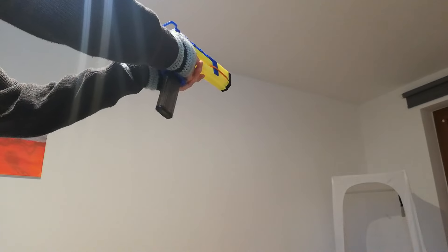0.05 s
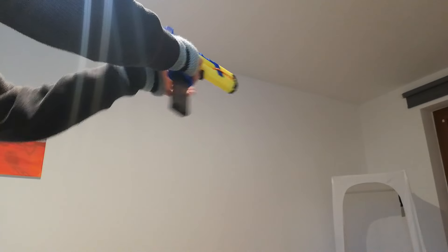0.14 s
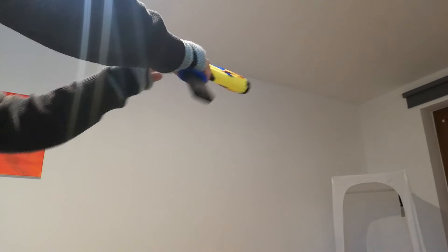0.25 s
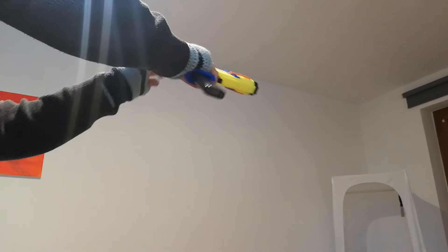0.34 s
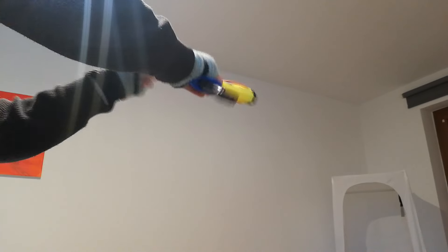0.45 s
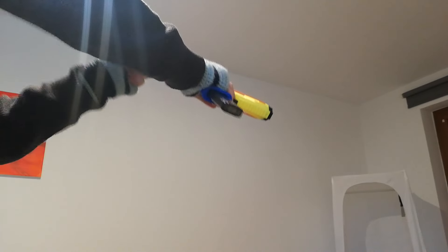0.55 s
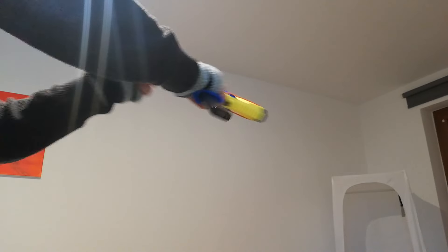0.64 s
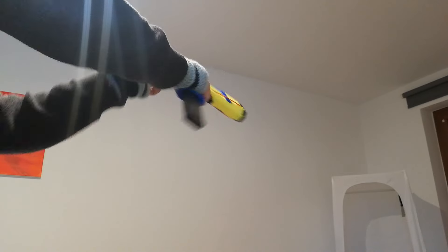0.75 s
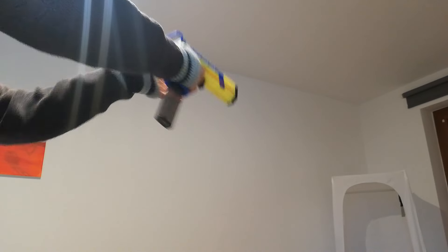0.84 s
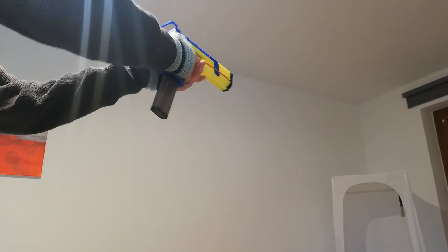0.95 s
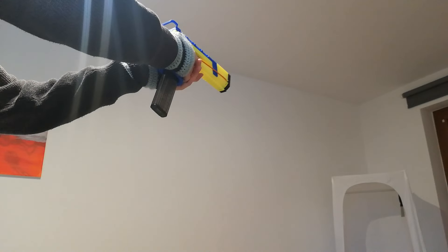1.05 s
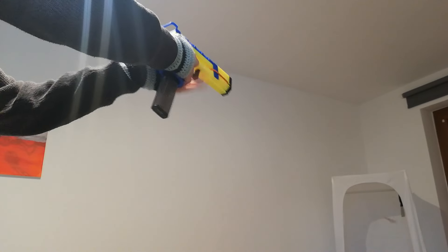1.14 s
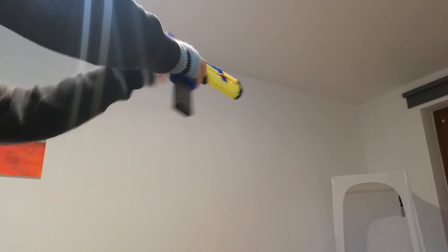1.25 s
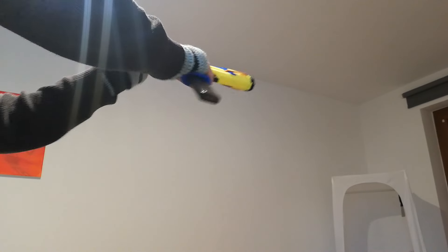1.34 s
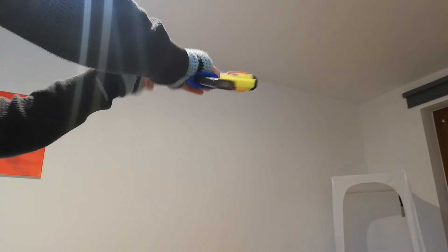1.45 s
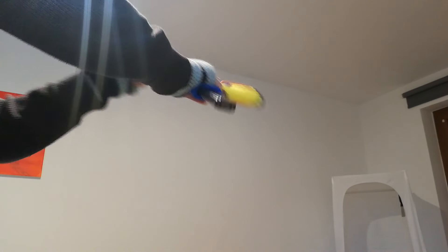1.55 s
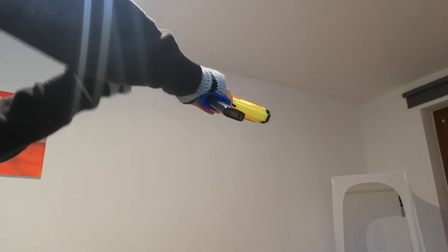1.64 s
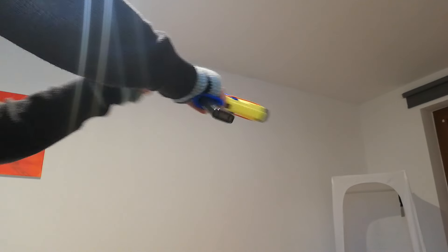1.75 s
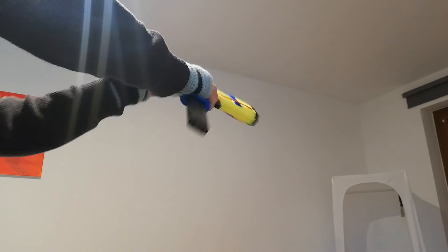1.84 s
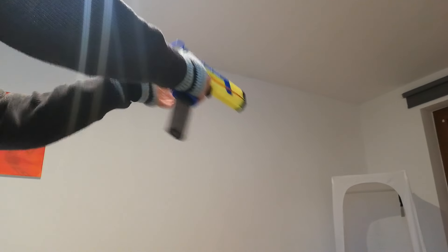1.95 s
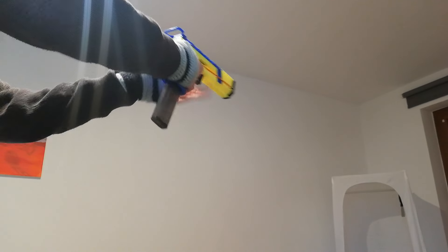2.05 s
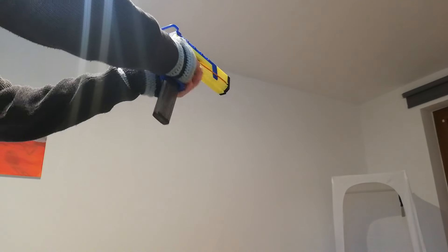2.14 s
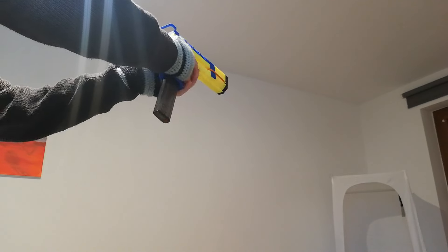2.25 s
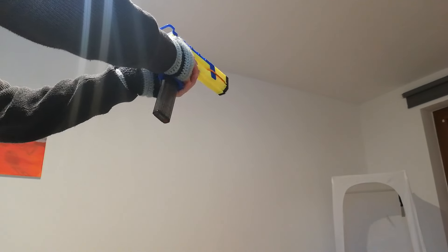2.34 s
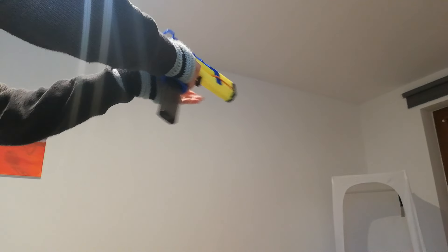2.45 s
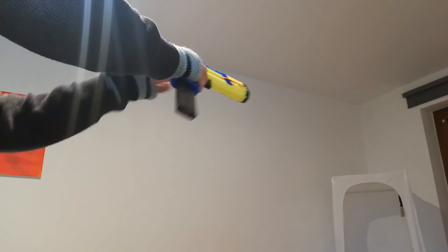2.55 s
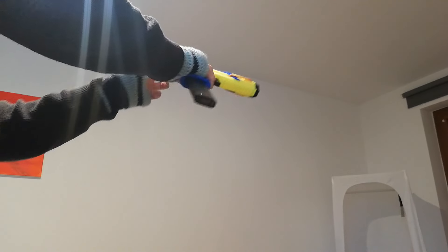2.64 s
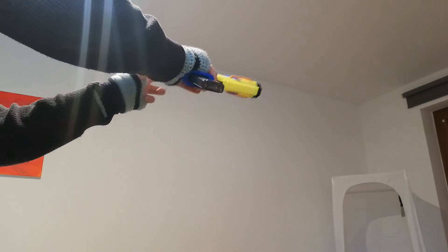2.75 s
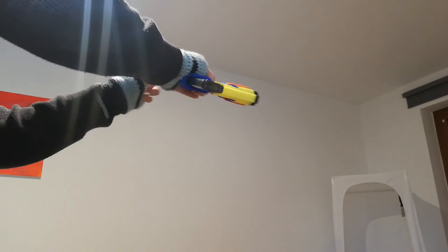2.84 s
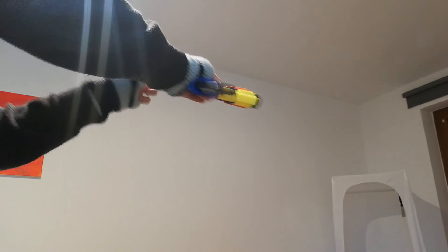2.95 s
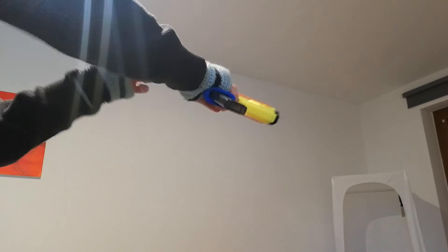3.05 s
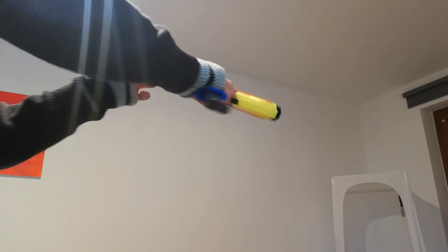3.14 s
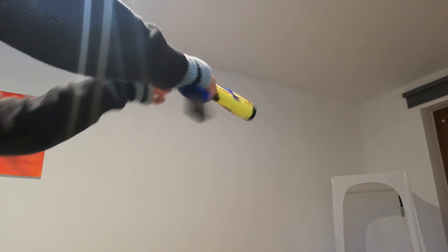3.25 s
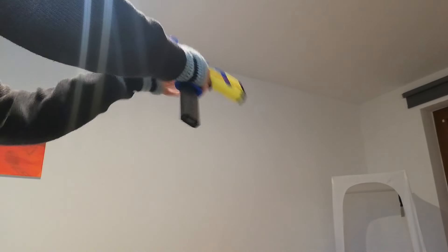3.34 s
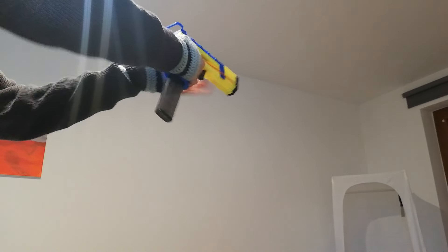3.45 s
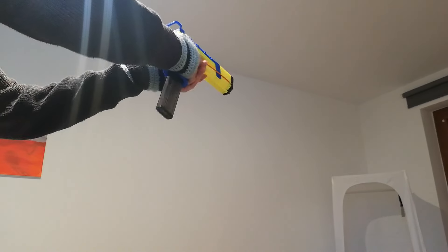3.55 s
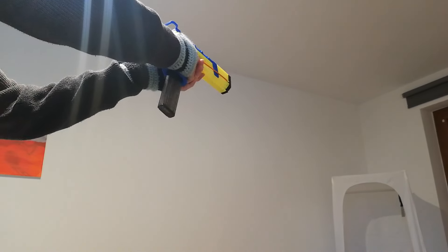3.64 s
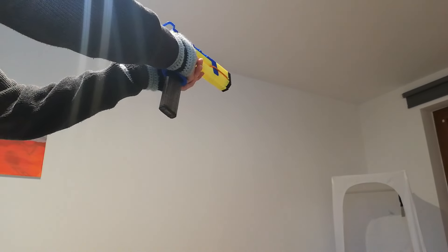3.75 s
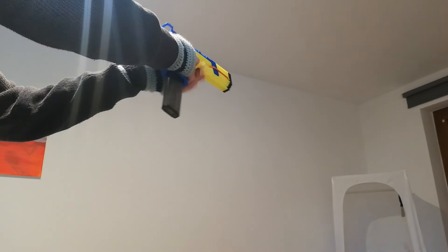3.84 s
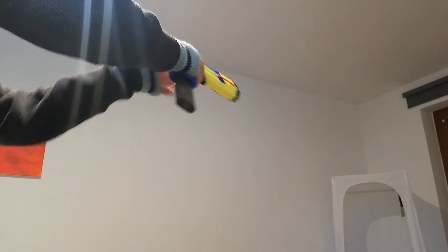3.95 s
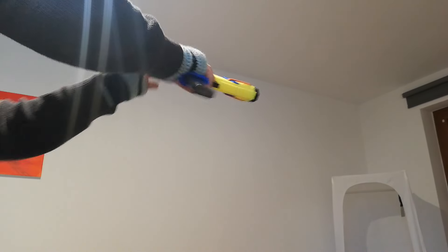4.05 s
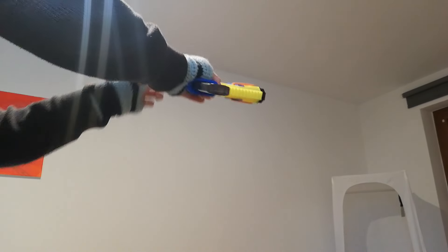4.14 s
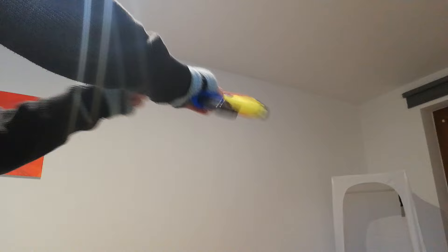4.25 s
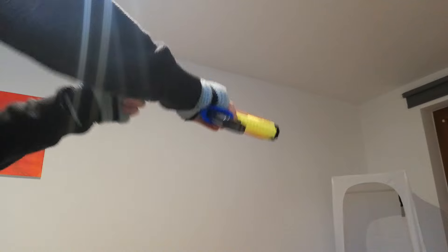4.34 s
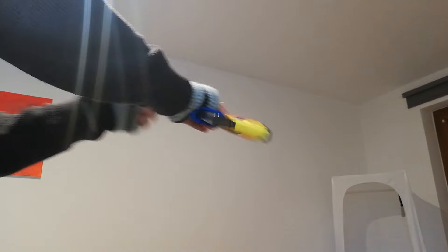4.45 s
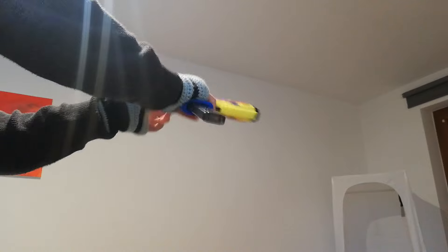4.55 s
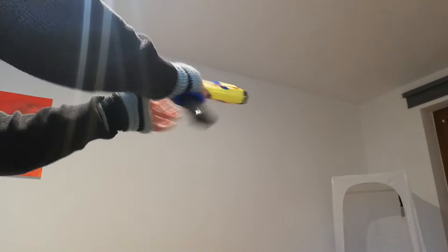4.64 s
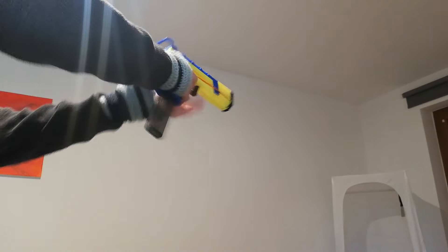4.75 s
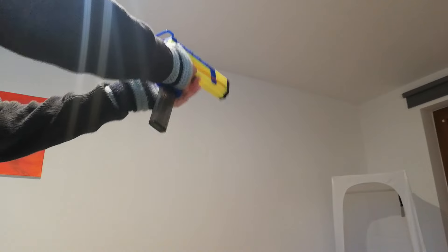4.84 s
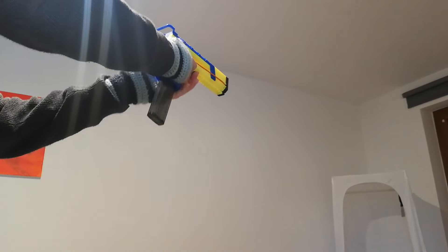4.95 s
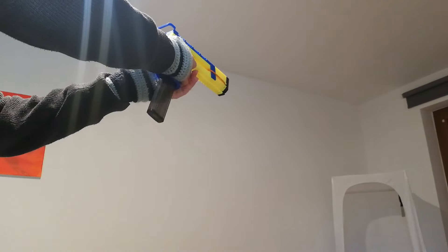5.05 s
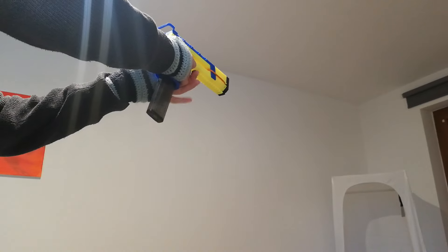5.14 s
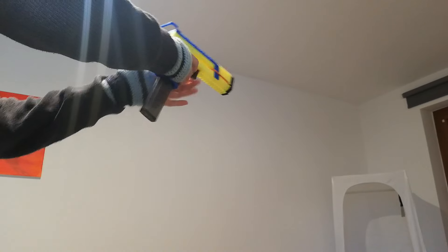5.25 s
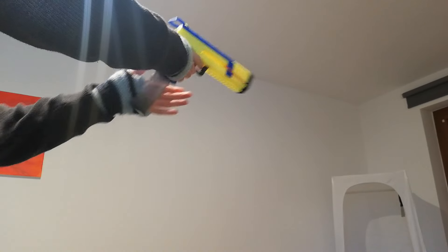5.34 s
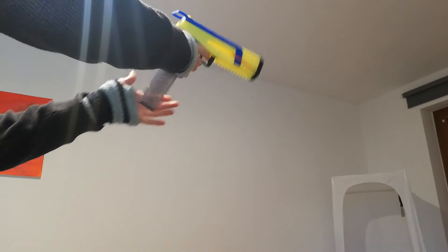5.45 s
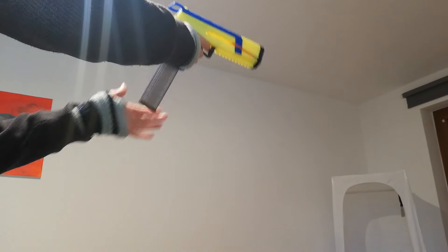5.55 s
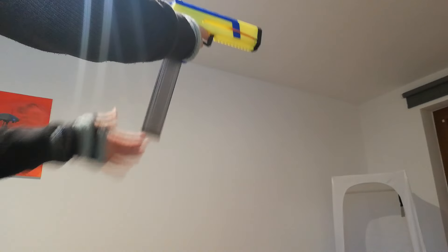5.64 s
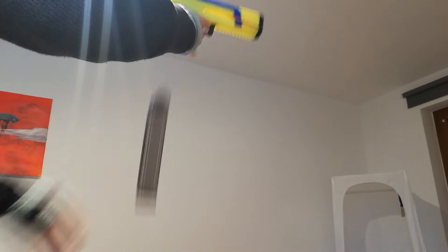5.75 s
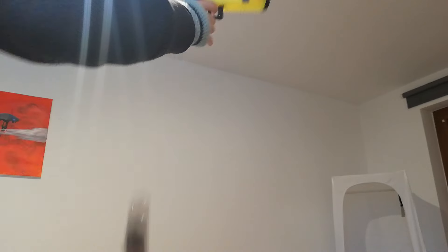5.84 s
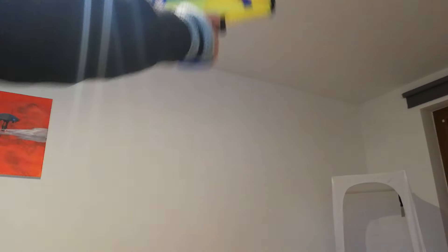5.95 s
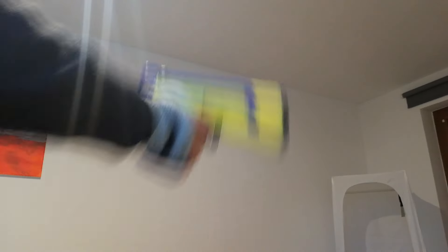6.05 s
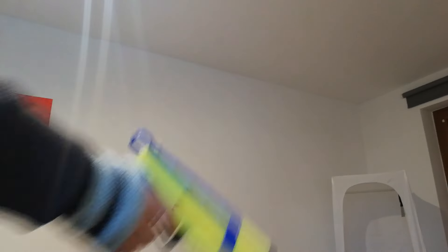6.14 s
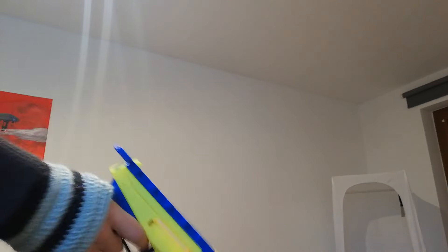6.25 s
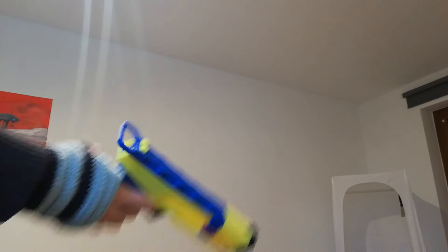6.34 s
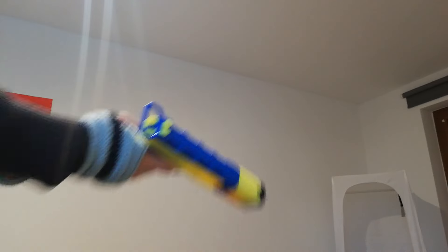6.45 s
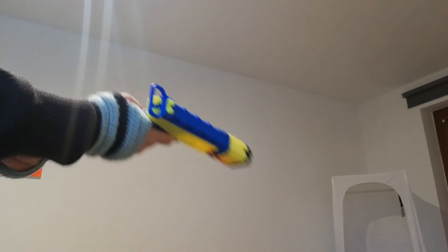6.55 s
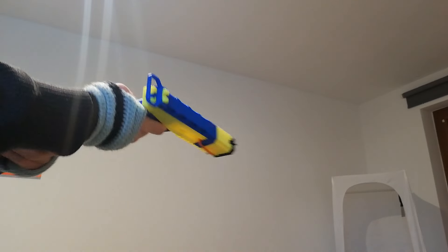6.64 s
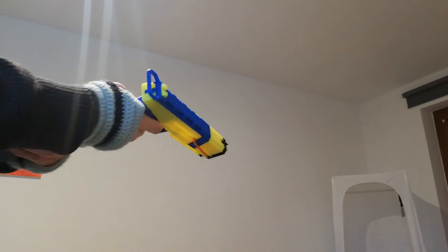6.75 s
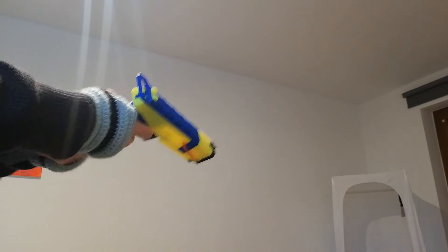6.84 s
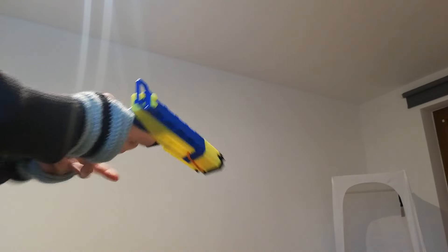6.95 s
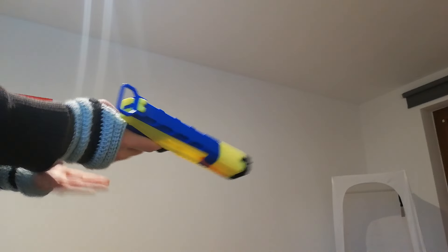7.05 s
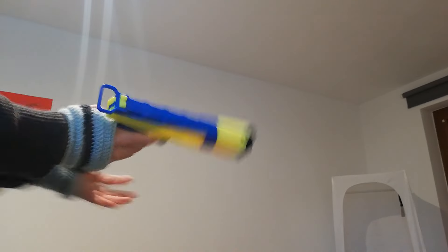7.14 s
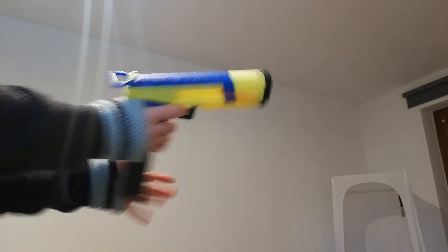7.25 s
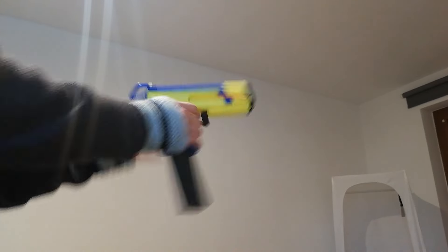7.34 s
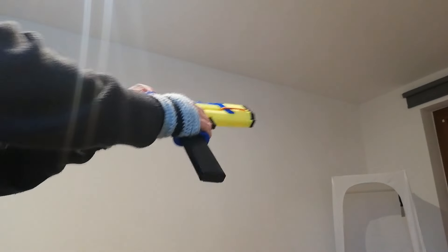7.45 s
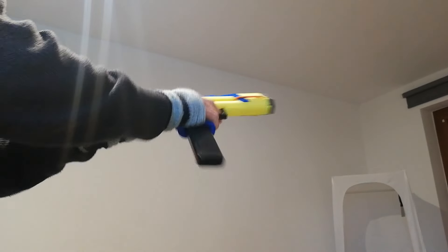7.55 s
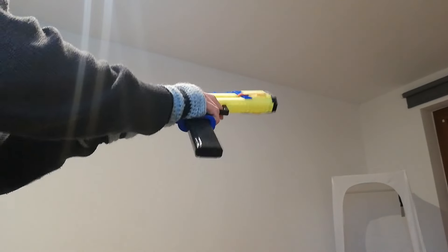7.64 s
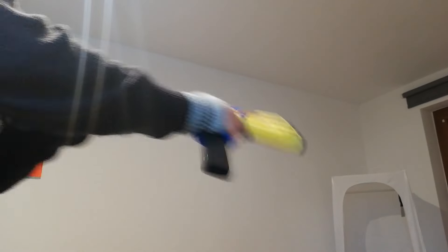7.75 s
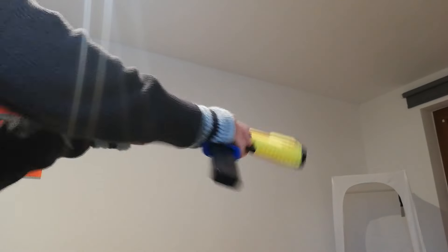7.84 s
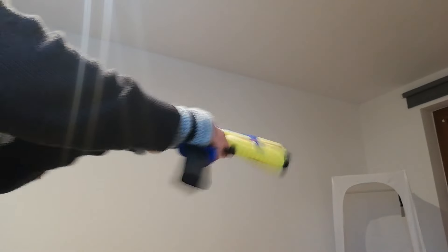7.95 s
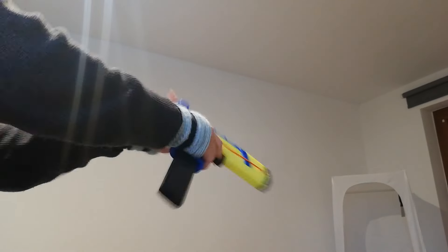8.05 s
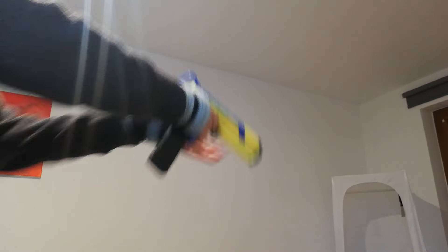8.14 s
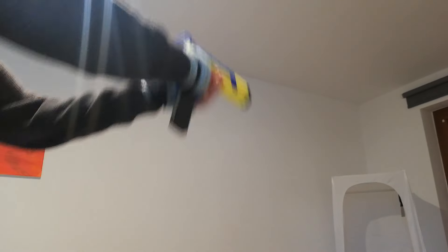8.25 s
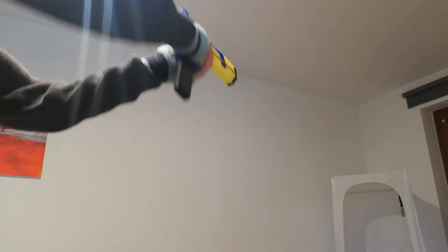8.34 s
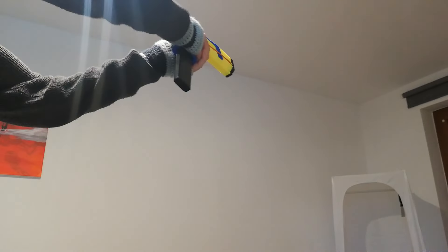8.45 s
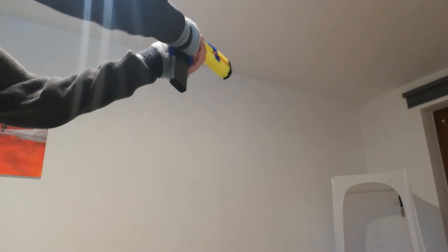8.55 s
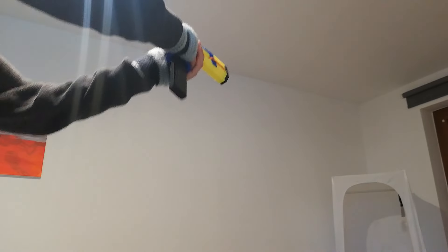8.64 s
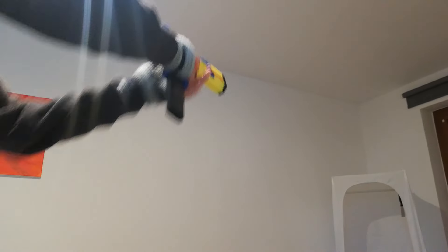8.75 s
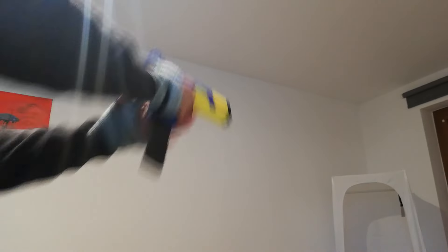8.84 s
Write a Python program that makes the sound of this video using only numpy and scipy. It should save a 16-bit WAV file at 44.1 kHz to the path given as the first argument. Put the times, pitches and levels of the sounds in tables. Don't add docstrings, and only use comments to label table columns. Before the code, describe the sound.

A spring toy blaster is racked and fired repeatedly in an echoing bare room, darts thudding a hollow door, then a magazine drops, bounces and is replaced.

```python
import sys
import numpy as np
from scipy import signal
from scipy.fft import rfft, irfft
from scipy.io import wavfile
from scipy.ndimage import uniform_filter1d

SR = 44100
rng = np.random.default_rng(int(sys.argv[2]) if len(sys.argv) > 2 else 0)


def elevation(decibels):
    levels = np.asarray(decibels, float)
    return 10 ** (levels / 20)


def unload_wav(signal):
    wavfile.write(
        sys.argv[1],
        SR,
        np.round(np.clip(np.atleast_2d(signal).T, -1, 1) * 32767).astype(np.int16),
    )


N = 392931
KNEE_DB, RATIO = -34.5, 1.606
FLOOR_ECHO_DB = 1.5


def unit(x):
    return x / np.sqrt(np.mean(x ** 2) + 1e-20)


def share(x, db):
    return x * elevation(db) / np.linalg.norm(x[1])


def along(points, hz):
    f, v = np.transpose(points)
    return np.interp(np.log(hz + 1), np.log(f + 1), v)


def true_db(db):
    return db + np.maximum(db - KNEE_DB, 0) * (RATIO - 1)


def coloured(x, spectrum):
    level_db = np.maximum(along(spectrum, np.fft.rfftfreq(4096, 1 / SR)), -70)
    cepstrum = irfft(np.log(elevation(level_db)))
    cepstrum[1:2048] *= 2
    cepstrum[2049:] = 0
    impulse = irfft(np.exp(rfft(cepstrum)))
    return signal.fftconvolve(x, impulse[None], axes=1)[:, :x.shape[1]]


def rung(x, modes):
    size = 4 * x.shape[1]
    f = np.fft.rfftfreq(size, 1 / SR)
    response = 0
    for k, (centre, width, db) in enumerate(modes):
        mode = 1j * f * width / (centre * centre - f * f + 1j * f * width)
        response = response + (-1) ** k * elevation(db) * mode
    return irfft(rfft(x, size) * response)[:, :x.shape[1]]


def blow(length, grain_db, lead=0.01):
    t = np.arange(SR // 8) / SR
    grains = np.repeat(rng.standard_normal(len(t) // 30 + 1), 30)[:len(t)]
    near = rng.standard_normal(len(t)) * elevation(grain_db * grains) * np.exp(-(t / length) ** 2.5)
    first_touch = t == 0
    near = near / np.linalg.norm(near) + lead * first_touch
    return np.array([near / np.linalg.norm(near), first_touch])


# frequency in Hz, likeness from -1 to 1.
LIKENESS = [(60, 0.94), (150, 1), (300, 0.77), (600, -0.73), (1200, 0.021), (8000, 0.1)]


def pair(seconds):
    hz, t, (a, b) = signal.stft(rng.standard_normal((2, round(seconds * SR))), SR, nperseg=1024)
    turn = np.arccos(np.clip(along(LIKENESS, hz), -1, 1))[:, None] / 2
    return hz, t, np.array([np.cos(turn) * a + np.sin(turn) * b, np.cos(turn) * a - np.sin(turn) * b])


# frequency in Hz, time to fade by 60 dB in seconds.
ROOM_ECHO = [(60, 0.53), (200, 0.42), (600, 0.52), (1500, 0.4), (4000, 0.4), (9000, 0.33), (15000, .21)]


def add(out, sound, s, db, pan_db, wet_db, lag, bend=1, linger=1):
    hz, t, z = pair(.8)
    fade_db = -60 * (t / linger / along(ROOM_ECHO, hz)[:, None]) ** bend
    tail = signal.istft(z * elevation(fade_db), SR, nperseg=1024)[1]
    tail *= np.clip(np.arange(tail.shape[1]) / SR / .006 - .5, 0, 1)
    heard = signal.fftconvolve(sound[1:], tail * elevation(wet_db) / np.linalg.norm(tail[0]), axes=1)
    heard[0, max(lag, 0):][:sound.shape[1]] += elevation(pan_db / 2) * sound[0]
    heard[1, max(-lag, 0):][:sound.shape[1]] += elevation(-pan_db / 2) * sound[0]
    start = round(s * SR)
    out[:, start:start + heard.shape[1]] += elevation(true_db(db)) * heard[:, :N - start]


def wander(size):
    return unit(uniform_filter1d(uniform_filter1d(rng.standard_normal(N), size=size), size=size))


# frequency in Hz, level in dB per Hz.
HOUSE_NOISE = [(15, -25.5), (25, -10), (64, -0.5), (108, -8.5), (575, -13), (887, -9.5), (1040, -7.5),
               (1400, -2.5), (2840, -23.5), (4140, -9), (5880, -24), (9070, -13.5), (14800, -36),
               (16000, -44.5)]
# start in seconds, hold in seconds, level in dB.
HUM_STIRS = [(0.12, 0.49, -49.5), (1.24, 0.52, -54), (2.41, 0.37, -56), (3.85, 0.38, -53),
             (5.359, 0.065, -64.5), (5.581, 0.019, -58), (5.8, 0.041, -66), (6.194, 0.18, -52),
             (6.753, 0.045, -55.5), (7.201, .85, -58), (8.166, 0.24, -66), (8.64, .3, -50)]


def hush():
    hz, _, z = pair(N / SR + .1)
    noise = signal.istft(z * elevation(along(HOUSE_NOISE, hz))[:, None], SR, nperseg=1024)[1][:, :N]
    hiss = elevation(-61.5) * unit(noise)
    hum_hz = 55 + 4 * wander(2500)
    hum = np.sqrt(2) * np.sin(2 * np.pi * np.cumsum(hum_hz) / SR)
    level = elevation(-74.5 + 2.5 * wander(3000))
    t = np.arange(N) / SR
    rise_db_per_s, fall_db_per_s = 221.5, 127
    for s, hold, db in HUM_STIRS:
        before, after = np.maximum(s - t, 0), np.maximum(t - s - hold, 0)
        level = level + elevation(db - rise_db_per_s * before - fall_db_per_s * after)
    return hiss + hum * level


# start in seconds, peak in dB, air pop in dB, left over right in dB.
PLUNGER_SHOTS = [
    (0.0491, -10, -27, 6),
    (1.152, -9.5, -23.5, -2),
    (2.3145, -8, -24, -4.5),
    (3.7538, -8, -24, -9.5),
    (5.105, -8.5, -36.5, -4),
    (8.549, -9, -26.5, -6.5),
]
# frequency in Hz, level in dB per Hz.
SLAM_COLOUR = [(530, -51.5), (900, -10.5), (1540, 1), (2720, -5), (4600, 1), (5720, -4.5), (8760, 3.5),
               (9540, 6), (11600, -5.5), (15500, -17.5), (16500, -53.5)]
# frequency in Hz, width in Hz, level in dB.
BARREL_AIR = [(430, 160, -8.5), (910, 54, 3)]


def plunger(out):
    for s, db, pop_db, pan_db in PLUNGER_SHOTS:
        slam = share(coloured(blow(0.013, grain_db=4), SLAM_COLOUR), 22)
        pop = share(rung(blow(0.0011, grain_db=4.5), BARREL_AIR), pop_db + 30)
        add(out, slam + pop, s - .001, db, pan_db, wet_db=-2, lag=-20)


# start in seconds, peak in dB, treble in dB, left over right in dB.
DART_HITS = [
    (0.137, -8, -10, 10),
    (1.24, -7.5, -10, 26.5),
    (2.399, -7, -18.5, 11.5),
    (3.844, -6.5, -11.5, 11),
    (8.642, -6, -12, 4),
]
# frequency in Hz, level in dB per Hz.
FOAM_THUD = [(24, -45.5), (40, -21), (118, -14), (173, -6.5), (235, -15), (257, -5), (426, -9), (467, -7),
             (832, -1.5), (1650, -10.5), (3000, -15), (3900, -20), (6600, -120)]
# frequency in Hz, width in Hz, level in dB.
DOOR_PANEL = [(462, 110, 12.5), (980, 67, -6)]
# frequency in Hz, level in dB per Hz.
CRACK_COLOUR = [(1530, -29), (2600, -13.5), (3230, -12.5), (3830, 1.5), (4360, -1.5), (9980, 1.5),
                (15600, -20.5), (16500, -47)]


def dart(out):
    for s, db, treble_db, pan_db in DART_HITS:
        hit = blow(0.01, grain_db=0, lead=0.4)
        thud = share(coloured(hit, FOAM_THUD), 13.27)
        panel = share(rung(hit, DOOR_PANEL), 3.5)
        crack = share(coloured(blow(0.013, grain_db=3.5), CRACK_COLOUR), treble_db + 16)
        add(out, thud + panel + crack, s + 0.003, db, pan_db / 3, wet_db=2, lag=0, bend=1.094, linger=1.29)


# frequency in Hz, width in Hz, level in dB.
SHELL_BODY = [(950, 160, -9.5), (1400, 110, 2), (1700, 230, 1.5), (2255, 290, -2), (3300, 240, -4.5)]


def clack(length, body_db, treble_db, ring_hz, ring_db, width_hz):
    near, push = blow(length, grain_db=2)
    tap = blow(length, grain_db=3, lead=.8)
    crack = coloured(np.array([near, .5 * near + np.roll(push, 60)]), CRACK_COLOUR)
    body = share(rung(tap, SHELL_BODY), body_db)
    ring = share(rung(tap, [(ring_hz, width_hz, 0)]), ring_db)
    parts = share(crack, treble_db) + body - ring
    return signal.lfilter([1, -1], [1, -.92], parts)


# start in seconds, peak in dB, ring in Hz, treble in dB.
CATCH_TICKS = [(0.5, -28.5, 8000, -7), (1.595, -30, 2270, -21), (2.775, -49.5, 1750, -9),
               (3.02, -27.5, 4480, -18), (3.694, -51.5, 4700, -24), (4.198, -36, 1700, -10),
               (4.286, -19.5, 4350, -26), (4.978, -56, 6360, -12.5), (5.298, -34.5, 7030, 0),
               (5.428, -48.5, 2330, -39), (5.501, -31, 3500, -13), (5.761, -50, 4450, -25),
               (7.501, -39.5, 1400, 5), (7.52, -30, 4400, -4), (6.181, -26, 3400, -23),
               (7.649, -48.5, 4590, 6.5), (7.779, -21, 3210, -5), (8.269, -48, 4160, 0)]
# start in seconds, peak in dB, ring in Hz, treble in dB.
LOOSE_KNOCKS = [(0.315, -30.5, 2050, -1), (2.28, -57, 6400, 7), (2.866, -36.5, 2230, -2.5),
                (4.107, -34, 1700, -4.5), (4.268, -40, 2160, -13), (4.84, -49.5, 1596, -3),
                (5.611, -40.5, 2490, -36), (5.901, -59, 2660, -3.5), (5.944, -52, 1580, -15),
                (7.187, -34, 2080, -1)]


def small_parts(out):
    for rows, body_db, ring_db in ((CATCH_TICKS, -15, -3), (LOOSE_KNOCKS, 2.3, -5.5)):
        for s, db, ring_hz, treble_db in rows:
            tick = clack(0.0047, body_db, treble_db, ring_hz, ring_db, width_hz=480)
            add(out, elevation(25) * tick, s, db, .8, wet_db=1, lag=-6)


# start in seconds, length in seconds, share of it (0-1) where fastest, peak in dB.
SLIDE_STROKES = [(0.497, 0.073, .3, -18), (0.675, 0.072, 0.7, -18), (1.599, 0.088, .45, -19.5),
                 (1.805, 0.062, .85, -17.5), (3.029, 0.051, 0.2, -16.5), (3.219, 0.1, 0.3, -18),
                 (4.29, 0.059, .4, -16), (4.458, 0.1, .65, -18), (5.63, 0.092, 0.5, -39.5),
                 (6.702, .22, .55, -33.5), (7.785, 0.041, 1, -12.5), (7.968, .05, .5, -15.5)]
# pitch in Hz, level in dB against the scrape.
SEAL_SQUEALS = [(7500, -4), (4700, -11), (6300, -9), (4800, -11), (7600, -3), (6900, -4), (7350, 0),
                (5700, -10), (4400, -9), (8000, -14), (9800, -4), (5650, -6)]
# frequency in Hz, level in dB per Hz.
RAIL_SCRAPE = [(180, -58), (300, -39.5), (1720, -5.5), (1830, -9.5), (2520, -4), (2700, -9.5), (3650, -7.5),
               (6780, -2), (9980, -2.5), (15700, -33), (16500, -38)]
# start in seconds, peak in dB.
REAR_STOPS = [
    (0.559, -10),
    (1.673, -9),
    (3.088, -13),
    (4.353, -13.5),
    (7.839, -8.5),
]


def slide(out):
    rest_hz, grip = 4300, .22
    for (s, length, fastest, db), (fastest_hz, squeal_db) in zip(SLIDE_STROKES, SEAL_SQUEALS):
        t = np.arange(0, length + 0.0014, 1 / SR)
        grit = elevation(3.5 * np.repeat(rng.standard_normal(len(t) // 40 + 1), 40)[:len(t)])
        scrape = unit(coloured(grit * rng.standard_normal((1, len(t))), RAIL_SCRAPE))

        breath = unit(1.5 + unit(uniform_filter1d(rng.standard_normal(len(t)), size=130)))
        back = any(abs(s + length - stop) < .03 for stop, _ in REAR_STOPS)
        end_hz = rest_hz + (.4 if back else 1) * (fastest_hz - rest_hz)
        glide = np.polyfit([grip, .65, 1], [rest_hz, fastest_hz, end_hz], 2)
        pitch_hz = np.polyval(glide, np.clip(t / length, grip, 1))
        whistle = elevation(squeal_db) * breath * np.sin(2 * np.pi * np.cumsum(pitch_hz) / SR)

        fade = np.clip(np.minimum(t, t[-1] - t) / 0.009, 0, 1)
        level_db = db + np.interp(t / length, [0, np.clip(fastest, .05, .95), 1], [-15, 0, -8.5])
        rubbing = scrape + [[1], [.45]] * whistle
        stroke = fade * elevation(true_db(level_db) - true_db(db)) * rubbing
        add(out, stroke * elevation(-4), s, db, 0, wet_db=2.5, lag=-9)


# start in seconds, peak in dB, ring in Hz, ring level in dB.
SEATINGS = [
    (0.746, -7.5, 1550, -7),
    (1.864, -9, 1607, -13),
    (3.294, -8.5, 2246, -2),
    (4.535, -4.5, 4210, -6),
    (7.222, -6.5, 1375, -7),
    (8.024, -9, 1500, -3.5),
]


def end_stops(out):
    stops = [(s, db, -16.5, .5, 4600, .5) for s, db in REAR_STOPS]
    stops += [(s, db, -3.5, -.5, ring_hz, ring_db) for s, db, ring_hz, ring_db in SEATINGS]
    for s, db, *colour in stops:
        knock = clack(.008, *colour, width_hz=280)
        add(out, elevation([[16], [12]]) * knock, s, db, .8, wet_db=-4, lag=-14)


# start in seconds, level in dB.
GRIP_THUMPS = [(0.56, -48), (1.87, -47), (2.869, -51.5), (3.05, -43), (5.11, -48), (3.302, -54),
               (7.221, -41.5), (7.519, -60), (7.8, -47.5), (8.03, -50.5)]
# frequency in Hz, width in Hz, level in dB.
FLOOR_BOARDS = [(205, 38, 2.5), (144, 34, -1)]


def grip_thumps(out):
    for s, db in GRIP_THUMPS:
        thump = share(rung(blow(0.0044, grain_db=0), FLOOR_BOARDS), 26)
        add(out, thump, s, db, 0, FLOOR_ECHO_DB, lag=0)


# start in seconds, peak in dB, boom in dB, left over right in dB, ring in dB.
FLOOR_BOUNCES = [
    (6.146, -1, -27, 12.5, 7),
    (6.155, -3.5, -18, 2.5, 2),
    (6.181, -33.5, 12, -2.5, -2.5),
    (6.476, -6, -23, -6.5, 5.5),
    (6.49, -21.5, -20.5, 3, 8.5),
    (6.646, -19, -15.5, -8, 5.5),
    (6.783, -19, -21, 7, 5.5),
    (6.93, -30.5, -47, 22, 8.5),
    (6.992, -38.5, -37.5, 7, 14.5),
]
# frequency in Hz, level in dB per Hz.
SLAP_COLOUR = [(180, -41.5), (300, -2), (587, -11), (1210, -8), (1660, -29), (1770, -7), (3470, -5.5),
               (3770, -12), (9650, -6.5), (15700, -19), (16500, -46.5)]
# frequency in Hz, width in Hz, level in dB.
HOLLOW_CASE = [(1000, 300, 17), (1380, 330, 23.5), (1960, 150, 8), (3400, 250, 6)]


def magazine(out):
    for s, db, boom_db, pan_db, ring_db in FLOOR_BOUNCES:
        hit = blow(0.0073, grain_db=9, lead=2.9)
        slap = share(coloured(hit, SLAP_COLOUR), 8)
        case = share(rung(hit, HOLLOW_CASE), ring_db)
        boom = share(rung(blow(0.001, grain_db=-2), FLOOR_BOARDS), boom_db + 19.5)
        echo_db = FLOOR_ECHO_DB - 4 + 15.5 * (s - FLOOR_BOUNCES[0][0])
        add(out, slap + case + boom, s, db, pan_db, echo_db, lag=0)


def scene():
    out = hush()
    for source in (plunger, dart, small_parts, slide, end_stops, grip_thumps, magazine):
        source(out)
    return out


def follow(level_db, fall_db):
    ramp_db = fall_db * np.arange(len(level_db))
    return np.maximum.accumulate(level_db + ramp_db) - ramp_db


def top_cut(x):
    return signal.sosfilt(signal.butter(12, 16760, fs=SR, output="sos"), x)


def record(dry):
    power = np.abs(uniform_filter1d(np.mean(dry ** 2, 0), size=800))
    level_db = follow(10 * np.log10(power + 1e-12), 404.5 / SR)
    cut_db = uniform_filter1d(np.maximum(level_db - KNEE_DB, 0) * (1 - 1 / RATIO), size=200)
    x = dry * elevation(-cut_db)
    mix = x / (1 + np.abs(x / .98) ** 6) ** (1 / 6)
    return top_cut(mix)


dry = scene()
out = record(dry)
unload_wav(out)
```